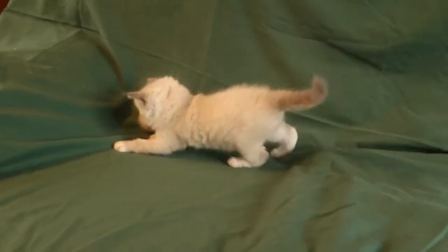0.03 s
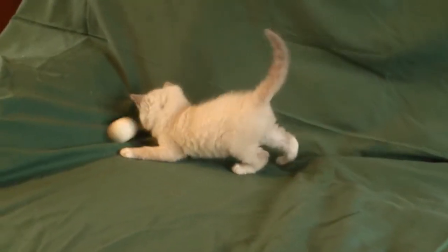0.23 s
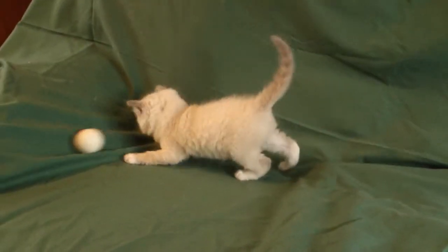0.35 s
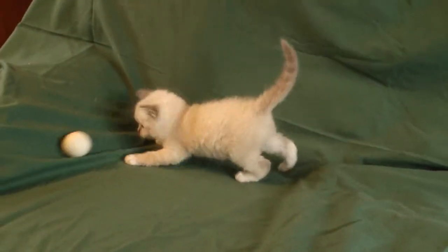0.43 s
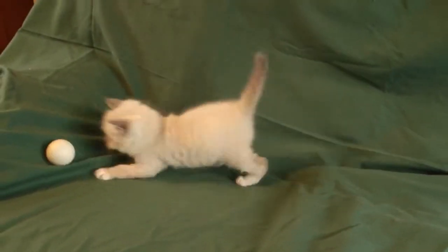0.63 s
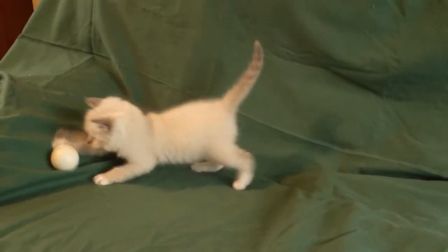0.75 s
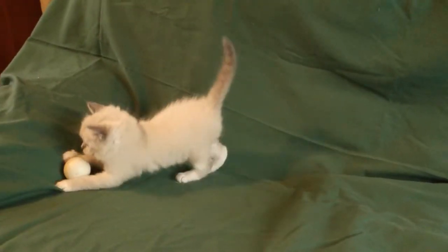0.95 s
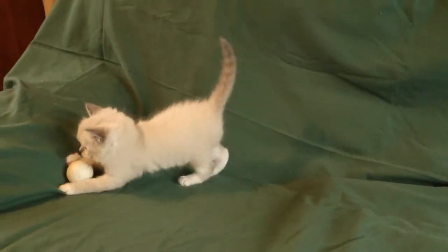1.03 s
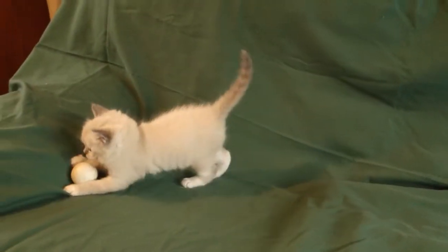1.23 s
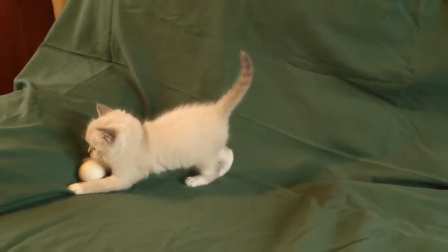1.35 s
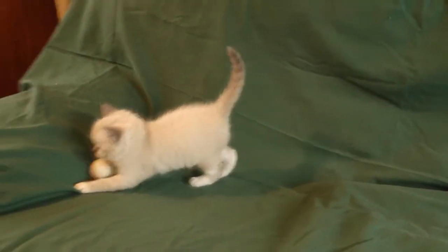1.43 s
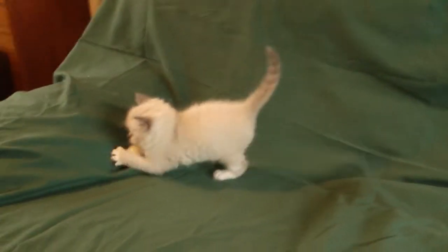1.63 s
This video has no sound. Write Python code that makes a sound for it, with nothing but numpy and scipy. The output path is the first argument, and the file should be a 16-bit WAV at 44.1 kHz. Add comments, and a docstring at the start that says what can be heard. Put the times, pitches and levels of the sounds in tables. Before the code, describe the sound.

Claws tick and scrape on a small hollow plastic ball at about 0.2 to 0.3 seconds, thin and high. A kitten's paws thud softly on a cloth-covered cushion around 0.7 seconds. The sharpest tick comes at 0.85, followed by a few duller ball knocks and a cloth brush near 1 second. Faint bumps follow from 1.4 to 1.7 seconds, over a quiet room's steady hiss.

```python
"""Claws scrape and tick on a small hollow plastic ball, whose thin shell rings high and briefly.
A kitten is batting it across a cloth-covered couch: the ball gives a few duller knocks,
paws thud on the cushion and brush the cloth. The quiet room answers faintly over a steady hiss."""
import sys
import numpy as np
from scipy import signal
from scipy.fft import rfft, irfft
from scipy.io import wavfile

SR = 44100
rng = np.random.default_rng(int(sys.argv[2]) if len(sys.argv) > 2 else 0)


def unload_wav(signal):
    """Save mono or channel-first audio to the path in sys.argv[1] as 16-bit WAV at rate SR, clipped to [-1, 1]."""
    wavfile.write(
        sys.argv[1],
        SR,
        np.round(np.clip(np.atleast_2d(signal).T, -1, 1) * 32767).astype(np.int16),
    )


N = 74970

# shell resonances (frequency [Hz], half width [Hz], level [dB])
SHELL_MODES = [(6910, 130, -40), (8390, 535, -27), (9000, 160, -13.5), (10060, 163, -0.5), (10490, 96, -11),
               (10890, 170, -14.5), (11630, 140, -33.5), (12600, 750, -34.5)]


def shell_gain(hz):
    """Gain of the ball's thin shell: a sum of resonance peaks."""
    return sum(amp(db) / (1 + ((hz - centre) / width) ** 2) for centre, width, db in SHELL_MODES)


# claw strikes (time [s], level [dB])
TICKS = [(.2410, -37), (.2612, -37), (.2676, -53), (0.27, -29.5), (0.2732, -41), (.2790, -22.5),
         (.8480, -18.5)]
# strike force spectrum (frequency [Hz], level [dB])
TICK_SPECTRUM = [(3000, -12), (6000, 3.5), (8000, -2), (13000, 1.5), (14500, 2), (15500, -15.5)]


def claw_ticks():
    """A claw lands, rings the shell and slips briefly."""
    contact_s, top_hz = 0.000083, 13800
    slip_s, slip_db = 0.0032, -17.5
    tick = ring(lambda hz: shell_gain(hz) * amp(lookup(TICK_SPECTRUM, hz)))
    tick *= 1 - np.exp(-np.arange(len(tick)) / SR / contact_s)
    tick = signal.sosfilt(signal.butter(4, top_hz, fs=SR, output="sos"), tick)
    slips = [(s + slip_s / 10, slip_s, db + slip_db, 0) for s, db in TICKS]
    return impacts(TICKS, tick) + friction(slips, tick)


# drags over the shell (start [s], length [s], level [dB], growth [dB])
SCRAPES = [(0.193, .036, -64, 7), (0.247, 0.01, -53, -3), (.2055, 0.0085, -47.5, 0),
           (0.26, 0.016, -35.5, 8.5), (0.284, 0.054, -51.5, -25.5), (.372, 0.033, -69, -9),
           (0.405, 0.16, -74, 0), (0.618, .026, -69.5, 2), (0.855, 0.03, -53.5, -11), (0.951, .037, -63, 3),
           (.991, 0.033, -68.5, -15), (1.436, .2, -78, 6)]
# drag force spectrum (frequency [Hz], level [dB])
SCRAPE_SPECTRUM = [(700, 12), (3200, 33), (5000, 11), (7500, 1), (8800, 8.5), (10050, -2), (11200, 6.5),
                   (12200, 16.5), (13600, 7), (15500, 5)]


def scrapes():
    """Claws or cloth drag over the shell; softer strokes lose treble."""
    hard_db, knee_hz = -32, 11000
    out = np.zeros(N)
    for start_s, length_s, db, growth_db in SCRAPES:
        db_per_hz = 0.092 * max(hard_db - db, 0) / 1000

        def gain(hz):
            loss_db = db_per_hz * np.maximum(hz - knee_hz, 0)
            return shell_gain(hz) * amp(lookup(SCRAPE_SPECTRUM, hz) - loss_db)
        out += friction([(start_s, length_s, db, growth_db)], ring(gain))
    return out


# ball knocks (time [s], level [dB], pitch [Hz], half width [cycles], rebound delay [s])
KNOCKS = [(0.1902, -51, 1130, 0.48, .0011), (0.2409, -50, 2060, 0.41, .0012),
          (.2605, -50.5, 855, 0.78, 0.0012), (.6779, -44.5, 2960, 1.1, 0.0017),
          (0.6785, -47, 970, 1.7, 0.0024), (.7087, -47, 2190, 1.3, 0.00036),
          (0.8483, -32.5, 2350, 0.74, .00155), (.9539, -35.5, 2310, 0.54, 0.001196),
          (.9762, -49, 2550, 1.3, .0012), (0.9945, -40, 2560, 0.61, 0.00123),
          (1.0013, -38, 2630, 0.71, .0012), (1.0081, -42, 2680, 1.2, 0.00125),
          (1.3794, -51.5, 2040, 0.77, 0.00109), (1.665, -55.5, 915, 0.88, 0.0018)]


def ball_knocks():
    """The ball knocks: a click of a cycle or two, then a weaker rebound."""
    rebound_db, pitch_ratio, width_ratio = -7.5, 1.126, 1.58
    lead_s = 0.004
    t = np.arange(-lead_s, 2 * lead_s, 1 / SR)

    def click(cycles, width):
        return np.cos(2 * np.pi * cycles) * np.exp(-(cycles / width) ** 2)
    out = np.zeros(N)
    for s, db, hz, width, delay_s in KNOCKS:
        rebound = amp(rebound_db) * click(hz * pitch_ratio * (t - delay_s), width * width_ratio)
        add(out, s - lead_s, amp(db) * (click(hz * t, width) + rebound))
    return out


# paw slaps on taut cloth (time [s], level [dB])
SLAPS = [(.0084, -51), (.0265, -56), (.2603, -45.5), (.6778, -38.5), (.7086, -37), (.7255, -40.5),
         (1.665, -53)]
# slap spectrum (frequency [Hz], level [dB])
SLAP_SPECTRUM = [(40, -12.5), (150, -1), (300, 0), (470, -5), (620, -14), (1000, -18), (1400, -30),
                 (3800, -54), (5000, -69), (12000, -84)]
# cushion bounces (time [s], level [dB], pitch [Hz])
THUDS = [(.0005, -52, 256), (.0115, -54, 287), (0.2585, -48, 112), (0.268, -52, 60.5), (0.2875, -53, 117),
         (.678, -35.5, 121.7), (0.6871, -47, 58.3), (0.7088, -48, 147.5), (0.7236, -42, 138),
         (0.7395, -49.5, 62), (0.848, -49, 189), (0.973, -61.5, 131), (1.508, -49, 160),
         (1.528, -52.5, 149), (1.664, -55, 205)]
# low couch and room resonances (frequency [Hz], level [dB], T60 [s])
BOOM_MODES = [(98, -8.5, .13), (128.6, -26, 0.3), (198, -32, 0.093), (243.6, -23, 0.25), (325, -33.5, 0.42),
              (491.5, -28, 0.19)]


def cushion_thuds():
    """Paws slap the cloth, paws and ball bounce on the cushion; couch and room boom in response."""
    rise_s, t60_cycles = 0.0021, 11.7
    t = np.arange(SR // 2) / SR
    attack = 1 - np.exp(-t / rise_s)
    hits = impacts(SLAPS, ring(lambda hz: amp(lookup(SLAP_SPECTRUM, hz))))
    for s, db, hz in THUDS:
        add(hits, s, -amp(db) * attack * decay(t, t60_cycles / hz) * np.sin(2 * np.pi * hz * t))
    boom = sum(amp(db) * 2 * np.pi * hz / SR * decay(t, t60_s) * np.cos(2 * np.pi * hz * t)
               for hz, db, t60_s in BOOM_MODES)
    return hits + signal.fftconvolve(hits, boom)[:N]


# paw strokes (start [s], length [s], level [dB], growth [dB])
BRUSHES = [(0, 0.0339, -65, -5), (.186, .02, -70, 4), (.258, 0.046, -59, -8), (.678, 0.0085, -52, -13),
           (.69, 0.055, -66.5, -12), (.84, .07, -66, -9), (.956, 0.064, -66, 1), (1.655, 0.015, -76, 4)]
# cloth friction spectrum (frequency [Hz], level [dB])
CLOTH_SPECTRUM = [(60, -8), (300, 6.5), (800, -3.5), (1500, -5), (3200, -5.5), (4500, -12.5), (6500, -24),
                  (15000, -57)]


def cloth_brushes():
    """Paws rub over the couch cover."""
    return friction(BRUSHES, ring(lambda hz: amp(lookup(CLOTH_SPECTRUM, hz))))


# reflections off nearby surfaces (delay [s], relative level [dB])
ECHOES = [(.0046, -29), (0.0185, -25.5), (0.0322, -30)]
# room decay (frequency [Hz], T60 [s])
ROOM_T60 = [(100, .14), (1000, 0.49), (3000, .3), (10000, 0.24), (15000, 0.37)]


def room(x, tail_db, echo_db, onset_s=0.00083):
    """Adds early echoes and a short diffuse tail."""
    hz, t, spectra = signal.stft(rng.standard_normal(SR // 2), SR, nperseg=256)
    spectra *= decay(t, lookup(ROOM_T60, hz)[:, None])
    tail = signal.istft(spectra, SR, nperseg=256)[1]
    tail *= np.minimum(np.arange(len(tail)) / SR / onset_s, 1)
    response = amp(tail_db) * tail / np.linalg.norm(tail)
    for s, db in ECHOES:
        add(response, s, amp([db + echo_db]))
    return x + signal.fftconvolve(x, response)[:N]


# noise floor (frequency [Hz], relative density [dB])
HISS_SPECTRUM = [(20, -26), (40, -7), (60, 2), (120, -1), (250, -3), (450, -9), (800, -12.5), (1400, -16),
                 (3200, -19), (7700, -22.5), (10000, -18.5), (12000, -21.5), (15500, -25)]


def hiss(rms_db=-64.5):
    """Steady room rumble and microphone hiss."""
    gain = amp(lookup(HISS_SPECTRUM, np.fft.rfftfreq(N, 1 / SR)))
    noise = irfft(rfft(rng.standard_normal(N)) * gain, N)
    return amp(rms_db) * noise / np.sqrt(np.mean(noise ** 2))


def impacts(rows, response):
    """Single blows, each ringing the response."""
    out = np.zeros(N)
    for s, db in rows:
        add(out, s, amp(db) * response)
    return out


def friction(rows, response, catches_per_s=3500, spread_db=2.5):
    """Runs of tiny random catches, each ringing the response."""
    out = np.zeros(N)
    for start_s, length_s, db, growth_db in rows:
        n = int(length_s * SR)
        caught = rng.random(N)[:n] < catches_per_s / SR
        size = rng.standard_normal(N)[:n]
        catches = caught * np.sign(size) * amp(spread_db * np.abs(size))
        ramp = amp(growth_db * np.linspace(-0.5, 0.5, n))
        stroke = signal.fftconvolve(catches * ramp, response)
        add(out, start_s, amp(db) * stroke / np.sqrt(np.sum(stroke ** 2) / n + 1e-20))
    return out


def ring(gain_at, size=4096):
    """Minimum-phase impulse response, peak 1, of a gain curve."""
    hz = np.abs(np.fft.fftfreq(size, 1 / SR))
    log_gain = np.log(np.maximum(gain_at(hz), 1e-6))
    spectrum = np.exp(np.conj(signal.hilbert(log_gain)))
    response = np.fft.ifft(spectrum).real[:size // 2]
    return response / np.abs(response).max()


def amp(db):
    """Decibels to gain."""
    return 10 ** (np.asarray(db) / 20)


def decay(t, t60_s):
    """Envelope falling 60 dB in t60_s."""
    return np.exp(-np.log(1000) * t / t60_s)


def lookup(table, hz):
    """Interpolates on a log-frequency axis."""
    table_hz, values = np.transpose(table)
    return np.interp(np.log(hz + 1), np.log(table_hz + 1), values)


def add(mix, start_s, sound):
    """Mixes a sound in at start_s."""
    part = mix[max(round(start_s * SR), 0):][:len(sound)]
    part += sound[:len(part)]


def scene():
    """Ball, paws and cloth in the room, mono."""
    shell = room(claw_ticks() + scrapes(), tail_db=-17.5, echo_db=5)
    knocks = room(ball_knocks(), tail_db=-10.5, echo_db=-19)
    couch = room(cushion_thuds() + cloth_brushes(), tail_db=-10.5, echo_db=0.5)
    return (shell + knocks + couch + hiss())[None]


def record(dry):
    """Cuts the deepest bass and the top of the treble."""
    low_hz, high_hz = 38, 15850
    highpass = signal.butter(2, low_hz, "high", fs=SR, output="sos")
    lowpass = signal.firwin(511, high_hz, window=("kaiser", 9), fs=SR)
    return signal.oaconvolve(signal.sosfilt(highpass, dry), lowpass[None], "same")


dry = scene()
out = record(dry)
unload_wav(out)
```